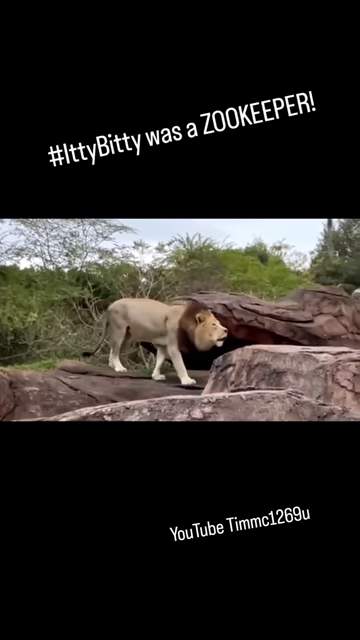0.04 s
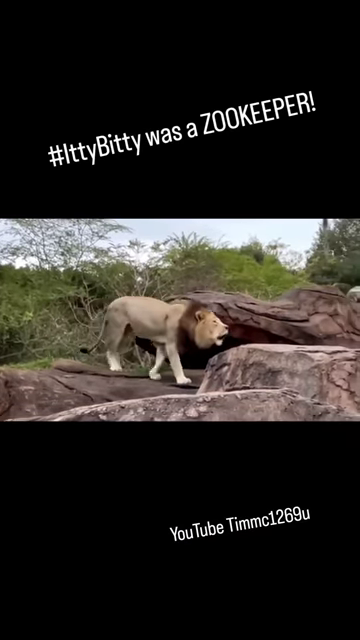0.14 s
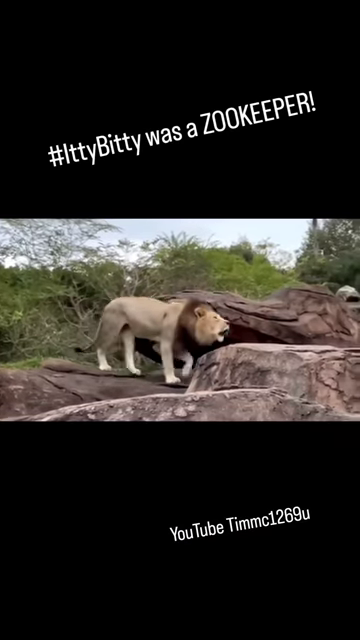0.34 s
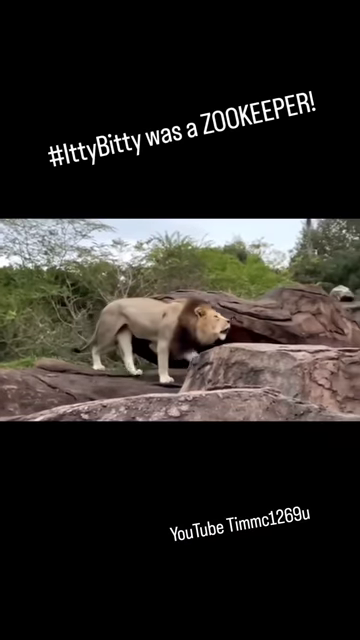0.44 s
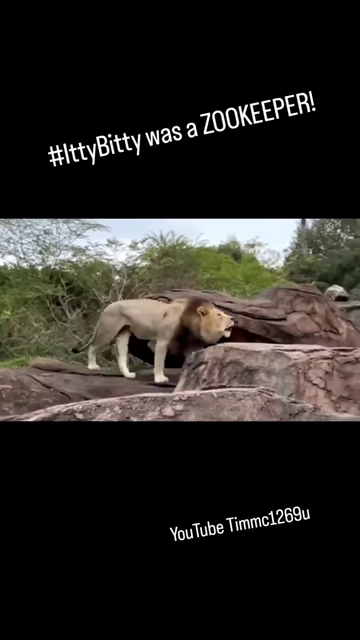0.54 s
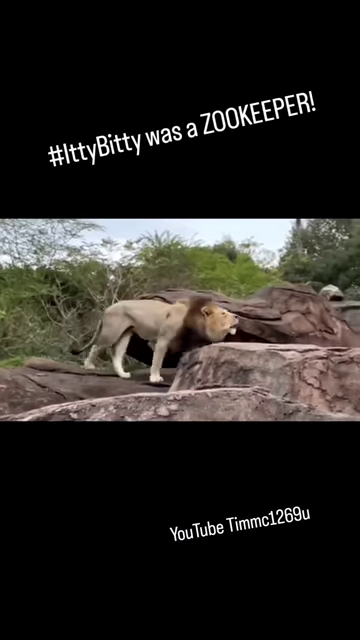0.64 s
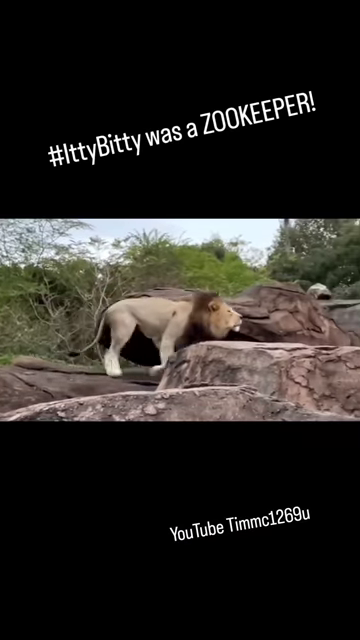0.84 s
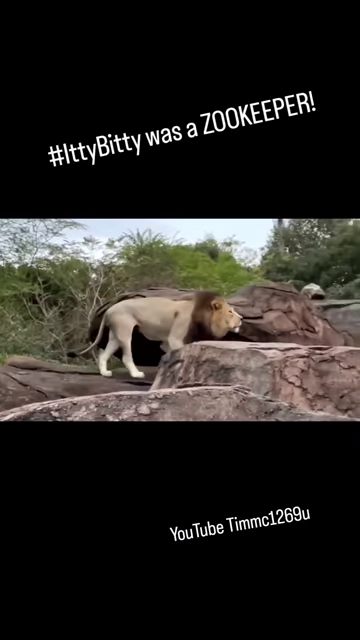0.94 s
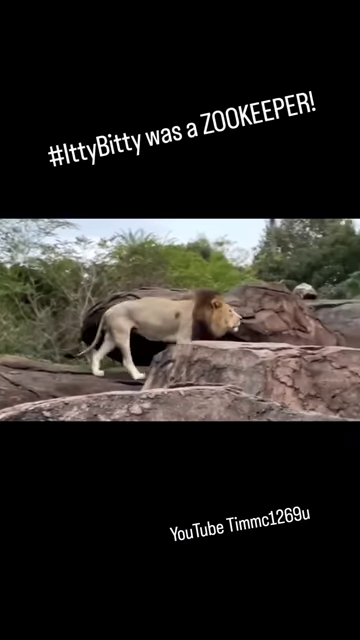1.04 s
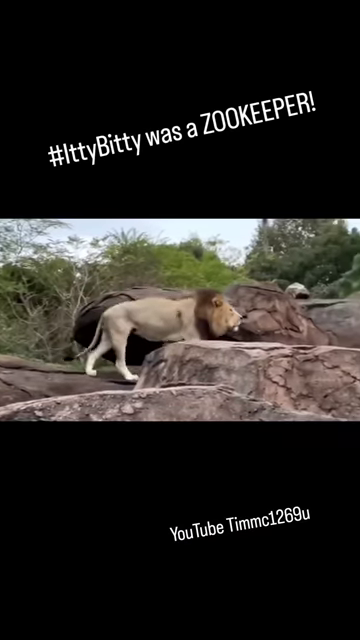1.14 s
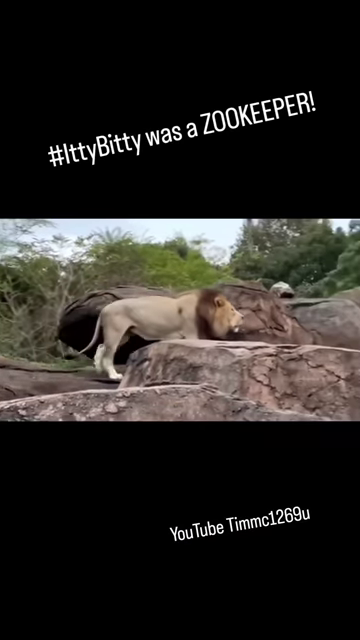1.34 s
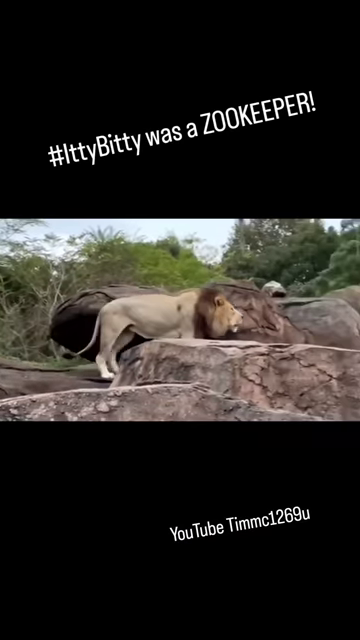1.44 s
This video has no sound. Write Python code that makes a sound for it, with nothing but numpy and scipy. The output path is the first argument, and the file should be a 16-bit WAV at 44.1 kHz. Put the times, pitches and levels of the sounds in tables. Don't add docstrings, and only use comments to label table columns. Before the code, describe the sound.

A lion gives one roar: a clear rising moan, a hoarse rasping break, a loud open climax, then a falling growl. Faint rock echoes follow in an outdoor enclosure, with low wind thumping the microphone.

```python
import sys
import numpy as np
from scipy import signal
from scipy.fft import rfft, irfft
from scipy.io import wavfile
from scipy.ndimage import uniform_filter1d

SR = 44100
rng = np.random.default_rng(int(sys.argv[2]) if len(sys.argv) > 2 else 0)


def dump(signal):
    limited = np.clip(np.atleast_2d(signal).T, -1, 1)
    pcm = np.round(limited * 32767).astype(np.int16)
    wavfile.write(sys.argv[1], SR, pcm)


def makeup_ratio(level_db):
    decades = np.asarray(level_db, float) / 20
    return 10 ** decades


N = 66150
T = np.arange(N) / SR

# time_s, pitch_hz, first_db, second_db, third_db (partial levels)
MOAN_PHASE = [
    (.17, 136, -44, -50, -44),
    (.19, 143, -27, -38, -31),
    (.23, 168, -11, -33, -32),
    (.258, 190, -13, -27, -32),
    (.279, 210, -8.5, -20, -25),
    (.296, 214, -21, -24, -33),
    (.312, 210, -27, -32, -36),
    (.34, 197, -40, -30, -45),
]
HOARSE_PHASE = [
    (0.339, 195, -51, -30, -45),
    (0.372, 197.3, -34.5, -27.5, -58),
    (0.411, 209.4, -44, -26, -50),
    (0.454, 215.3, -35.5, -24, -52),
    (0.484, 197.3, -34.5, -14.5, -31),
    (0.508, 176.9, -32, -23, -33.5),
    (0.539, 173.1, -48, -27, -49.5),
    (0.554, 175.3, -21.5, -21.5, -31),
    (0.604, 176.5, -52, -16.5, -26.5),
]
CLIMAX_PHASE = [
    (.6, 175, -33, -20, -39),
    (.648, 181, -30, -6.5, -40),
    (.682, 177, -22, -8, -38),
    (.705, 173, -17, -19, -22),
    (.735, 167, -11, -34, -15),
    (.775, 162, -11, -30, -9.5),
    (.83, 155, -13, -34, -14),
    (.865, 150, -15, -36, -32),
    (.92, 149, -24, -37, -40),
]
GROWL_PHASE = [(.92, 149, -28, -37, -40), (0.971, 146.6, -36, -32, -41), (1.012, 142.4, -33, -41, -51),
               (1.04, 137, -30.5, -33, -44), (1.07, 126.8, -25.5, -37, -34.5),
               (1.101, 132.8, -20.5, -46, -47), (1.135, 114.3, -26.5, -55, -67),
               (1.159, 94, -28.5, -37, -43), (1.191, 82.2, -35, -41.5, -42), (1.221, 70.6, -19.5, -34, -52),
               (1.25, 66.4, -54.5, -56, -58)]
# time_s, rasp_db, chest_share_db, breath_db
AIRFLOW = [(.165, -65.5, 1.5, -6.5), (.185, -52.5, 14.5, 5.5), (.22, -39.5, 2, 3.5),
           (.29, -39.5, 10.5, 6.5), (.34, -34.5, 4, 1), (.45, -32.5, -3, -2), (.53, -36, 2.5, -4.5),
           (.6, -31, 0, -5.5), (.7, -32.5, 7, -1.5), (.82, -33, 3.5, 2), (.9, -36.5, 6.5, 8.5),
           (.96, -31.5, 1.5, 5), (1.03, -37.5, 10, 10), (1.09, -40.5, 6, 4), (1.13, -45.5, -4.5, 4.5),
           (1.2, -51.5, -0.5, 1), (1.3, -65, -3, 11)]
# start_s, length_s, level_db, start_hz, end_hz
LOOSE_FOLD_TONES = [(0.295, 0.056, -23, 215, 282), (0.353, 0.048, -28.5, 205, 227),
                    (0.401, 0.078, -17.5, 160, 182), (0.575, 0.091, -24.5, 965, 954),
                    (0.633, 0.09, -24.5, 764, 665), (0.716, 0.12, -35.5, 346, 359.2),
                    (0.801, 0.066, -17.5, 222, 216.6), (0.889, 0.088, -21, 205, 198.7),
                    (0.97, 0.072, -25, 270.4, 264.4), (0.499, .13, -24.5, 489, 446.3),
                    (0.478, 0.11, -32, 693.5, 675), (0.55, 0.068, -27.5, 1143, 1052),
                    (1.076, 0.045, -29, 199, 205)]
# start_s, length_s, level_db, start_hz, end_hz
TORN_STRANDS = [(.19, 0.062, -41, 1120, 1100), (0.26, 0.073, -43, 800, 970), (.39, 0.06, -38, 850, 830),
                (.42, 0.083, -35.5, 560, 670), (.55, .06, -30.5, 830, 480),
                (0.451, 0.036, -33.5, 1000, 1200), (.42, .05, -38, 1500, 2100), (.79, 0.056, -35, 950, 940),
                (.85, 0.07, -32, 800, 880), (.925, 0.058, -30, 870, 850), (.97, 0.058, -29, 850, 760),
                (.92, 0.095, -40, 1100, 970), (.94, 0.063, -41, 920, 1080), (0.75, 0.11, -32.5, 570, 565),
                (.87, 0.05, -23.5, 320, 280), (0.94, .07, -38, 500, 374), (.9, 0.078, -33, 460, 476),
                (.94, .09, -34, 660, 610), (.96, .05, -28, 440, 413), (1.05, 0.074, -33.5, 290, 359),
                (1.03, 0.079, -34.5, 480, 529), (1.05, 0.078, -41, 690, 670), (0.95, 0.075, -45, 789, 823)]
# centre_hz, width_hz, level_db
THROAT_RINGS = [(171.7, 47, -4.5), (390.5, 157, 0), (630, 314, -6.5), (839, 163, -2.5), (1122, 206, -4.5),
                (1450, 100, -16), (1780, 1300, -38.5), (2190, 220, -30.5), (3560, 500, -46.5),
                (5900, 370, -43.5)]
# start_s, length_s, share_db, start_hz, end_hz
MOUTH_RINGS = [(0.205, 0.16, -8, 2200, 2500), (0.254, .14, -7.5, 2650, 3100),
               (0.261, 0.13, -7.5, 1450, 1700), (0.341, .13, -3, 2450, 2050), (0.374, 0.12, -3, 1650, 1850),
               (0.431, 0.056, -19.5, 2550, 2450), (.46, .13, -11, 1900, 1750),
               (0.578, .14, -10.5, 1900, 2150), (.6, 0.15, -16, 1750, 1500),
               (0.751, 0.051, -10, 2850, 2680), (0.816, 0.12, -10, 2750, 2550),
               (0.844, 0.082, -7, 2300, 2050), (0.923, .11, -12, 2100, 2300), (.98, 0.13, -9, 2650, 2450)]
# frequency_hz, level_db
FIZZ_SPECTRUM = [(1200, 9), (4000, -1.5), (7500, -7), (9400, -6), (10600, -13.5), (11400, -26.5),
                 (12400, -15), (14500, -21)]
# frequency_hz, t60_s
ROCK_DECAY = [(200, 0.43), (1000, 0.74), (4000, 0.43), (10000, 0.043)]
# frequency_hz, level_db
WIND_SPECTRUM = [(20, -19.5), (40, 2), (62, 15), (100, 5), (170, -7.5), (270, -30), (600, -71)]
# time_s, level_db
GUST_CURVE = [(0, -36), (.16, -36.5), (.3, -39), (.6, -36.5), (.9, -34.5), (1.02, -30.5), (1.2, -36),
              (1.26, -40), (1.34, -37), (1.5, -33.5)]
# start_s, length_s, level_db, thump_hz
WIND_BUFFETS = [(.01, .07, -39.5, 44), (0.14, 0.08, -28, 66), (.58, 0.063, -33.5, 60),
                (1.302, .06, -27, 73), (1.355, 0.039, -31, 173), (1.385, 0.033, -31.5, 175),
                (1.391, .04, -26, 81), (1.435, 0.041, -28, 135), (1.36, 0.032, -38.5, 250),
                (1.3, 0.038, -38, 214), (1, 0.033, -33, 160)]
# frequency_hz, level_db
WASH_SPECTRUM = [(250, -10.5), (400, -10), (620, -1.5), (1000, -12.5), (2000, -18), (3500, -24),
                 (6000, -33.5), (11000, -36)]
# frequency_hz, level_db
TREBLE_GAP = [(20, 1.5), (7600, -2), (7850, -35.5), (8700, -26), (9100, -5.5), (20000, 4.5)]

ROAR = MOAN_PHASE + HOARSE_PHASE[1:] + CLIMAX_PHASE[1:] + GROWL_PHASE
ROAR = MOAN_PHASE + HOARSE_PHASE[1:] + CLIMAX_PHASE[1:] + GROWL_PHASE[1:]

WOBBLE_DB, WOBBLE_HZ = 1.1, 1.5
TEAR_S, TEAR_DB, TEAR_HZ = .9, 1.2, 5


def evened(x):
    return x / np.sqrt(np.mean(x ** 2) + 1e-20)


def column(table, index):
    rows = np.array(table)
    return np.interp(T, rows[:, 0], rows[:, index])


def colour(x, points):
    hz, db = np.transpose(points)
    bins_hz = np.fft.rfftfreq(N, 1 / SR)
    return irfft(rfft(x) * makeup_ratio(np.interp(np.log(bins_hz + 1), np.log(hz), db)), N)


def drift(hz):
    lowpass = 1 + (np.fft.rfftfreq(N, 1 / SR) / hz) ** 2
    return evened(irfft(rfft(rng.standard_normal(N)) / lowpass, N))


def progress(start, length):
    return np.clip((T - start) / length, 0, 1)


def tone(hz):
    return np.sqrt(2) * np.sin(2 * np.pi * np.cumsum(hz) / SR)


def resonate(x, hz, width):
    turn = np.exp(2j * np.pi * np.cumsum(hz * np.ones(N)) / SR)
    r = np.exp(-np.pi * width / SR)
    return 2 * (turn * signal.lfilter([1 - r], [1, -r], x / turn)).real


def patchy(shape, bands, frames):
    smooth = uniform_filter1d(rng.standard_normal(shape), size=bands, axis=0)
    return evened(uniform_filter1d(smooth, size=frames, axis=1))


def pitch():
    return column(ROAR, index=1)


def voice():
    torn = T > TEAR_S
    hz = pitch() + (WOBBLE_HZ + TEAR_HZ * torn) * drift(21)
    out = np.zeros(N)
    for k in (1, 2, 3):
        level_db = column(ROAR, index=k + 1) + (WOBBLE_DB + TEAR_DB * torn) * drift(47)
        out += makeup_ratio(level_db) * tone(k * hz)
    fade_in = np.clip((T - ROAR[0][0]) / 0.0033, 0, 1)
    fade_out = np.clip((ROAR[-1][0] - T) / 0.017, 0, 1)
    return fade_in * fade_out * out


def loose_folds():
    out = np.zeros(N)
    for start, length, db, from_hz, to_hz in LOOSE_FOLD_TONES:
        u = progress(start, length)
        hz = (from_hz + (to_hz - from_hz) * u) * (1 + .012 * drift(50))
        out += makeup_ratio(db) * np.sin(np.pi * u) * tone(hz)
    return out * makeup_ratio(WOBBLE_DB * drift(48))


def strands():
    out = np.zeros(N)
    for start, length, db, from_hz, to_hz in TORN_STRANDS:
        u = progress(start, length)
        hz = from_hz + (to_hz - from_hz) * u + 16 * drift(45.5)
        out += makeup_ratio(db + 2.03 * drift(60)) * np.sin(np.pi * u) * tone(hz)
    return out


def rough_air():
    turns = np.cumsum(pitch() / 2.3 * (1 + .2 * drift(60))) / SR
    starts = np.diff(np.floor(turns), prepend=0) > 0
    slaps = signal.lfilter([1], [1, -.9], starts * makeup_ratio(0.73 * rng.standard_normal(N)))
    puffs = (.5 + np.exp(-(turns % 1) / .9)) * rng.standard_normal(N)
    return slaps, puffs


def throat(drive):
    rings = []
    for k, (hz, width, db) in enumerate(THROAT_RINGS):
        centre = hz * (1 + .045 * drift(16))
        ring = resonate(resonate(drive, centre, width * 1.14), centre, width * 1.16)
        level = makeup_ratio(db + 3 * drift(22)) / np.sqrt(width / 100)
        rings.append((-1) ** k * level * ring)
    chest, upper = sum(rings[:3]), sum(rings[3:])
    return (chest * makeup_ratio(column(AIRFLOW, index=2)) + upper) / np.sqrt(np.mean(upper ** 2))


def mouth(puffs):
    out = np.zeros(N)
    width_hz = 340
    for start, length, db, from_hz, to_hz in MOUTH_RINGS:
        u = progress(start, length)
        hz = from_hz + (to_hz - from_hz) * u
        ring = resonate(resonate(puffs, hz, width_hz), hz, width_hz)
        out += makeup_ratio(db) * np.sin(np.pi * u) * evened(ring)
    return out


def fizz(puffs):
    z = signal.stft(colour(puffs, [(600, -42.5)] + FIZZ_SPECTRUM), nperseg=512)[2]
    frame_at = np.minimum(np.arange(z.shape[1]) * 256, N - 1)
    breath_db = column(AIRFLOW, index=3)[frame_at]
    response = np.linspace(.3, 2, len(z))[:, None]
    level = makeup_ratio(response * (2.6 * patchy(z.shape, 6, 9) + breath_db))
    z = z / np.sqrt(np.mean(abs(z) ** 2) * len(z)) * level
    return signal.istft(z, nperseg=512)[1][:N] * makeup_ratio(-9.5)


def rasp():
    slaps, puffs = rough_air()
    roughness = 0.82
    drive = (1 - roughness) * evened(slaps) + roughness * evened(puffs)
    fade_in = np.clip((T - AIRFLOW[0][0]) / 0.0075, 0, 1)
    fade_out = np.clip((AIRFLOW[-1][0] - T) * 20, 0, 1)
    level = fade_in * fade_out * makeup_ratio(column(AIRFLOW, index=1))
    return level * (throat(drive) + mouth(puffs) + fizz(puffs))


def rocks(x):
    taps, at = np.zeros(SR), np.arange(500, SR - 20, 20)
    taps[at + rng.integers(0, 20, len(at))] = rng.choice([-1., 1.], len(at))
    hz, t, z = signal.stft(taps, SR, nperseg=256)
    band_hz, band_t60 = np.transpose(ROCK_DECAY)
    t60 = np.interp(np.log(hz + 1), np.log(band_hz), band_t60)[:, None]
    tail = signal.istft(z * makeup_ratio(-60 * t / t60), SR, nperseg=256)[1]
    return signal.fftconvolve(x, tail / np.linalg.norm(tail))[:N]


def wind():
    gust_db = column(GUST_CURVE, index=1) + 1.8 * drift(14.0)
    rumble = evened(colour(rng.standard_normal(N), WIND_SPECTRUM))
    flutter = evened(resonate(resonate(rng.standard_normal(N), 180, 190), 180, 190))
    return rumble * makeup_ratio(gust_db) + flutter * makeup_ratio(2 * gust_db + 23.0)


def buffets():
    out = np.zeros(N)
    for start, length, db, hz in WIND_BUFFETS:
        swell = np.sin(np.pi * progress(start, length))
        out += np.sqrt(2) * makeup_ratio(db) * swell * np.sin(2 * np.pi * hz * (T - start))
    return out


def wash():
    noise = evened(colour(rng.standard_normal(N), [(120, -32.5)] + WASH_SPECTRUM))
    return noise * makeup_ratio(-54 + 1.2 * drift(2.1))


def scene():
    cat = voice() + loose_folds() + rasp() + strands()
    echoes = makeup_ratio(-17) * rocks(cat)
    return (cat + echoes + wind() + buffets() + wash())[None]


def gate_treble(x):
    hz, _, z = signal.stft(x, SR, nperseg=1024)
    power = uniform_filter1d(uniform_filter1d(abs(z) ** 2, size=7, axis=0), size=4, axis=1)
    threshold_db = -84 + 5 * patchy(z.shape, 7, 4)
    keep = (power > makeup_ratio(2 * threshold_db)) | (hz[:, None] < 10400)
    return signal.istft(z * keep, SR, nperseg=1024)[1][:N]


def top_cut(x):
    return signal.sosfilt(signal.butter(12, 14650, fs=SR, output="sos"), x)


def record(dry):
    faded = dry[0] * np.clip((T[-1] - T) / .004, 0, 1)
    gated = gate_treble(colour(faded, TREBLE_GAP))
    band_limit = signal.firwin(511, 14600, window=("kaiser", 9), fs=SR)
    mix = signal.oaconvolve(gated[None], band_limit[None], "same")
    return top_cut(mix)


dry = scene()
out = record(dry)
dump(out)
```